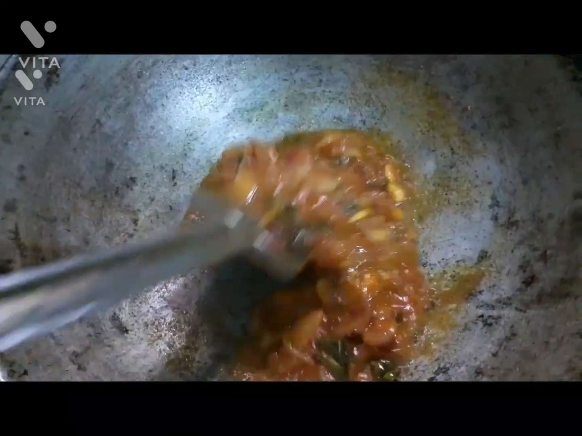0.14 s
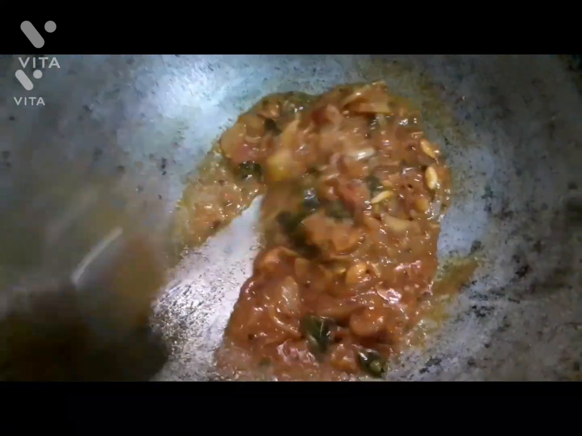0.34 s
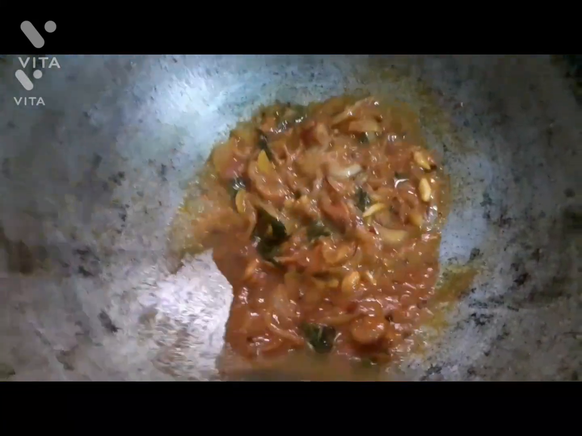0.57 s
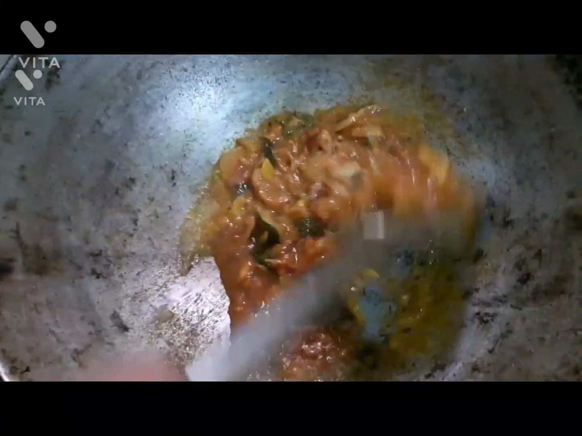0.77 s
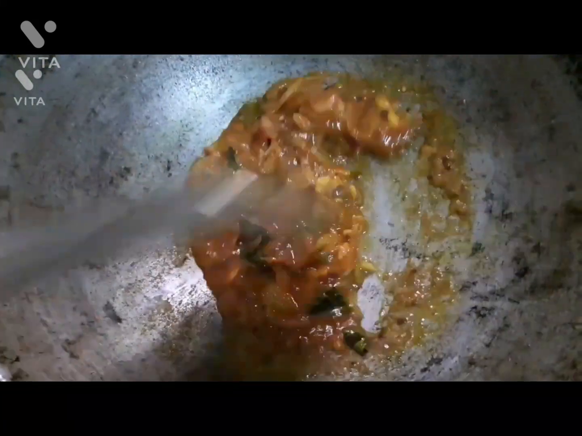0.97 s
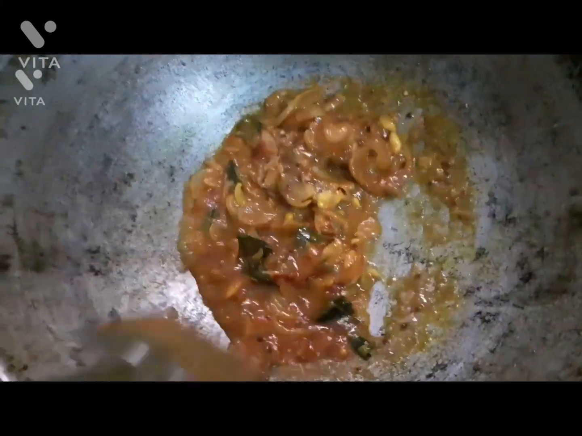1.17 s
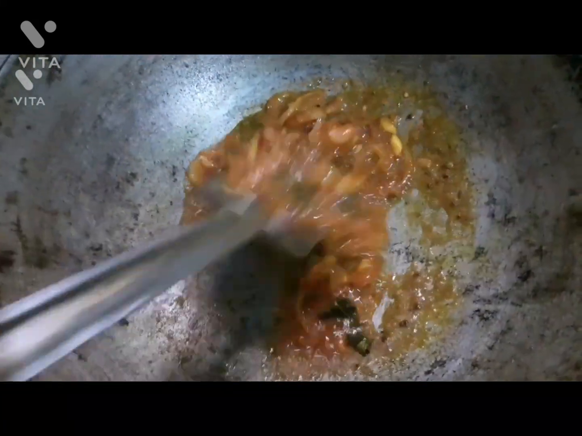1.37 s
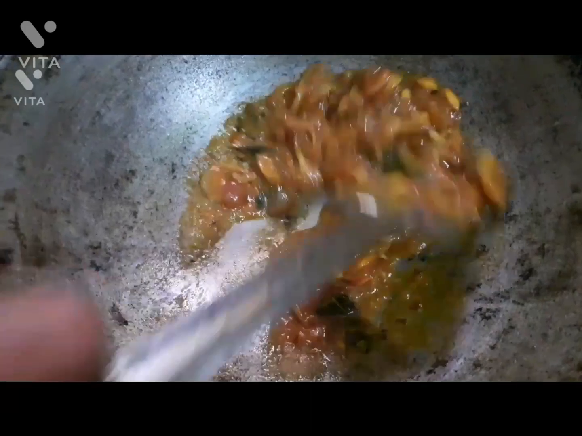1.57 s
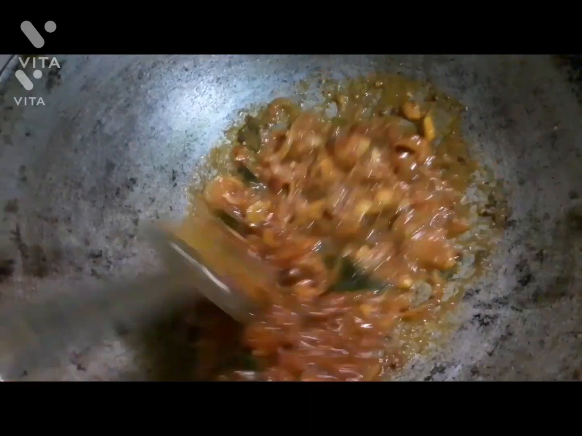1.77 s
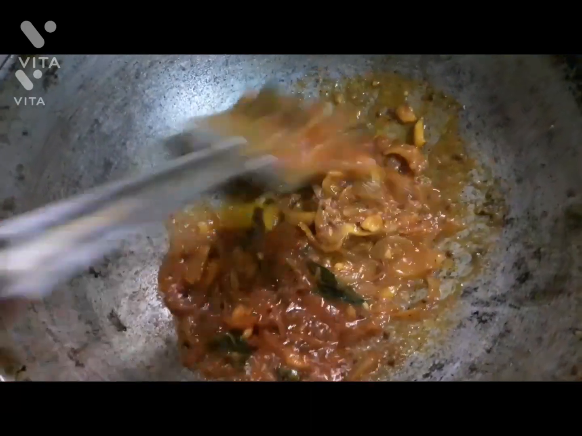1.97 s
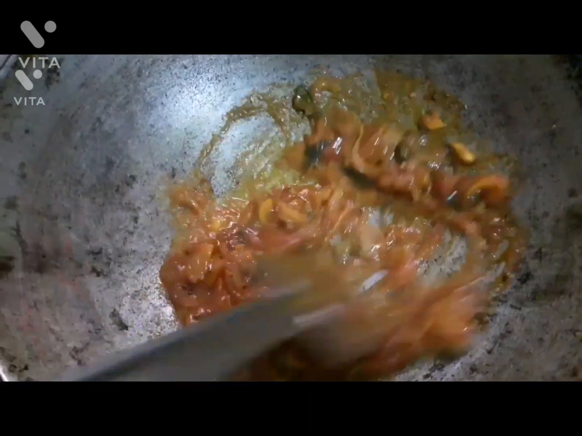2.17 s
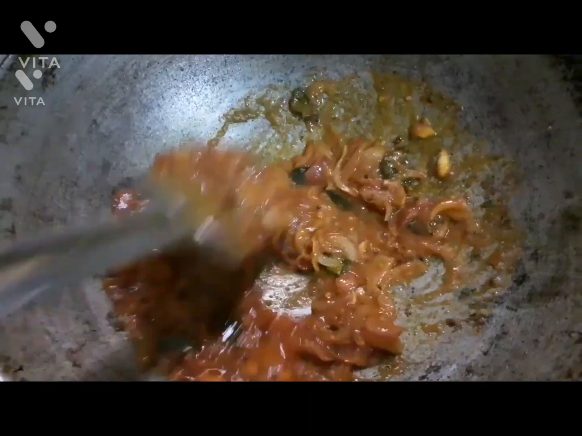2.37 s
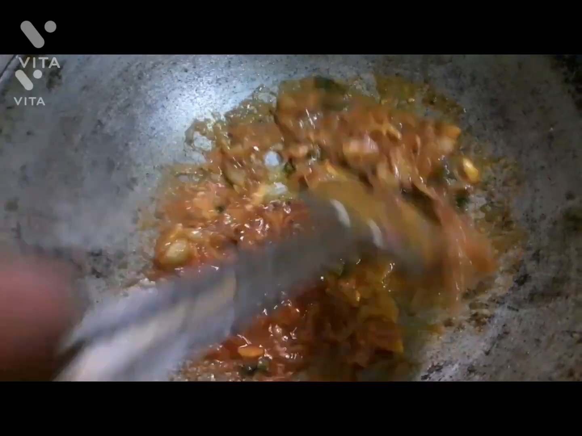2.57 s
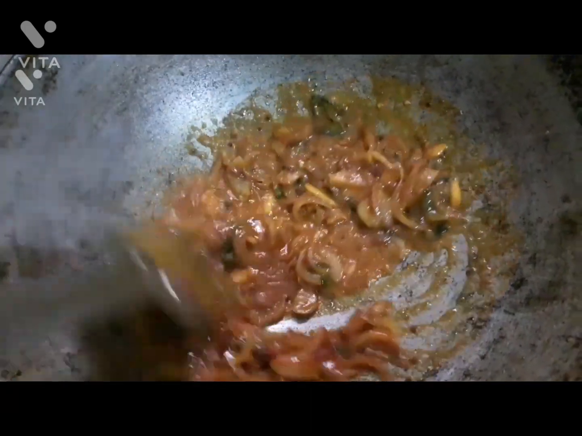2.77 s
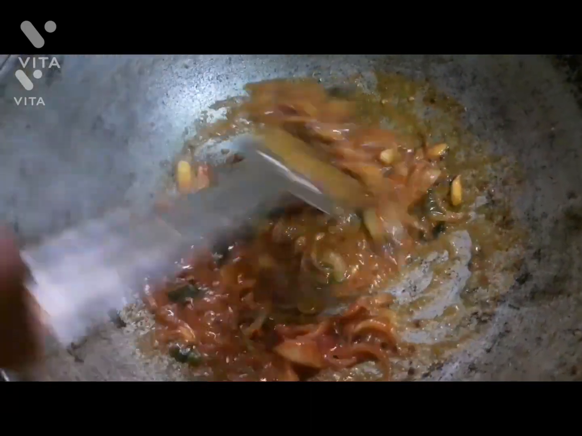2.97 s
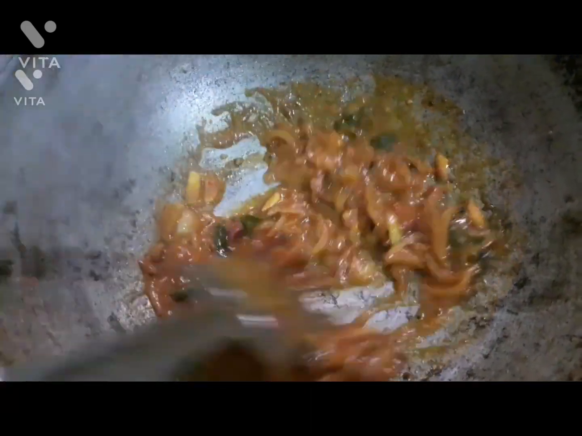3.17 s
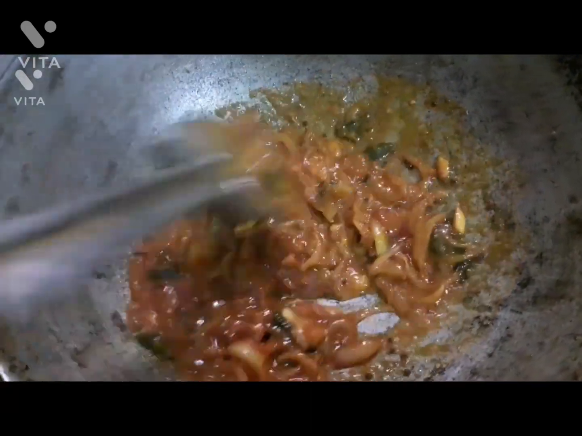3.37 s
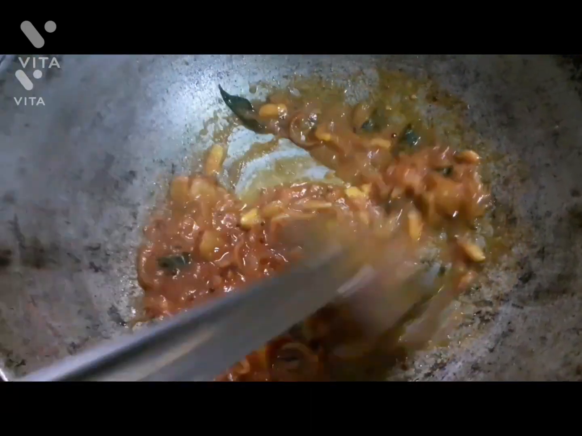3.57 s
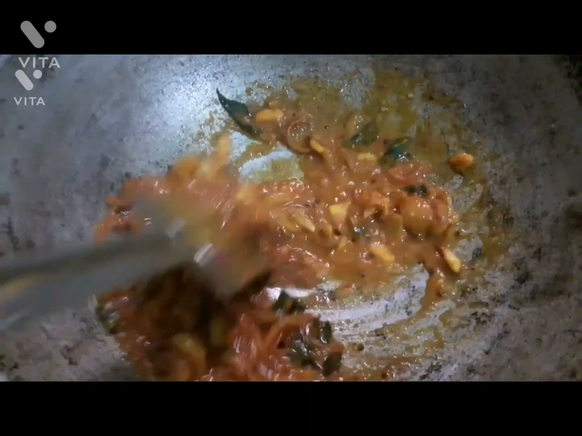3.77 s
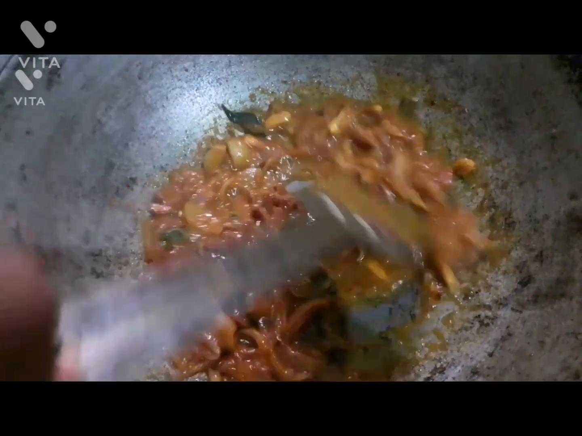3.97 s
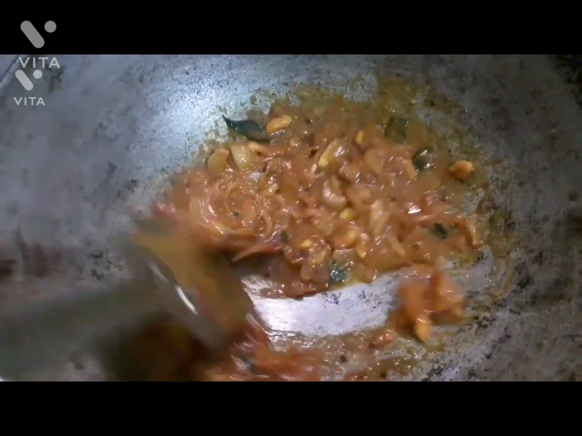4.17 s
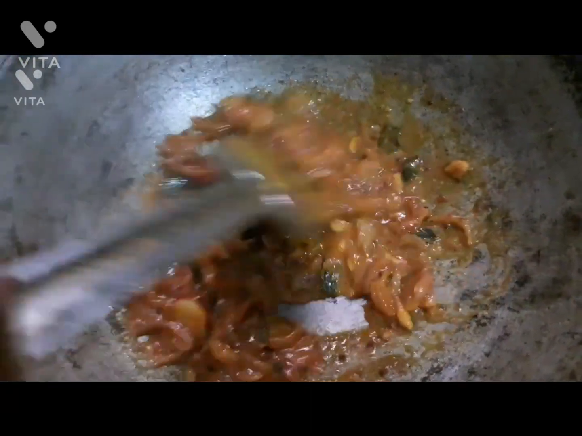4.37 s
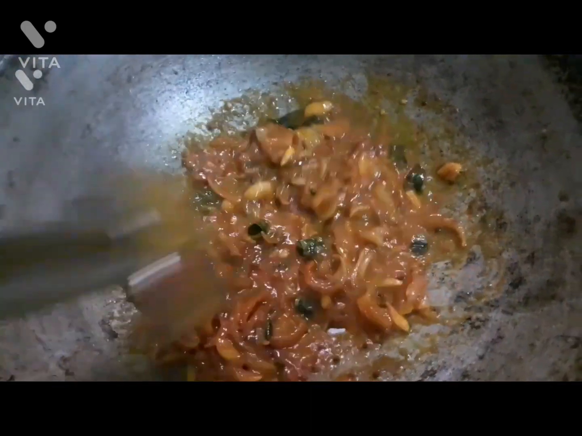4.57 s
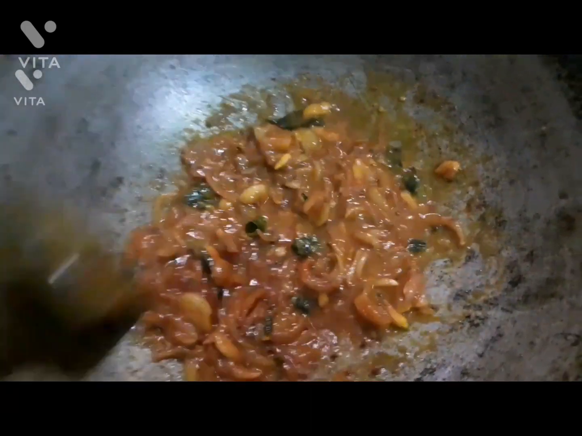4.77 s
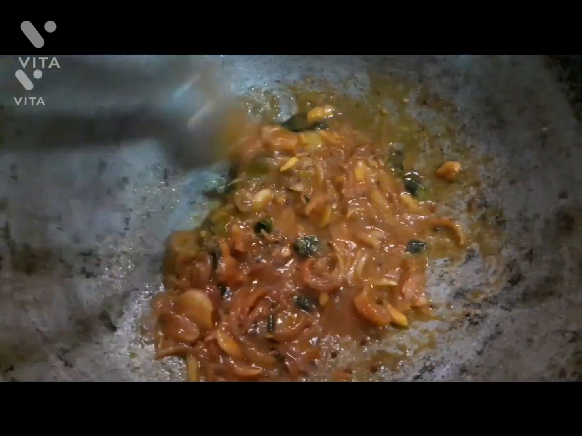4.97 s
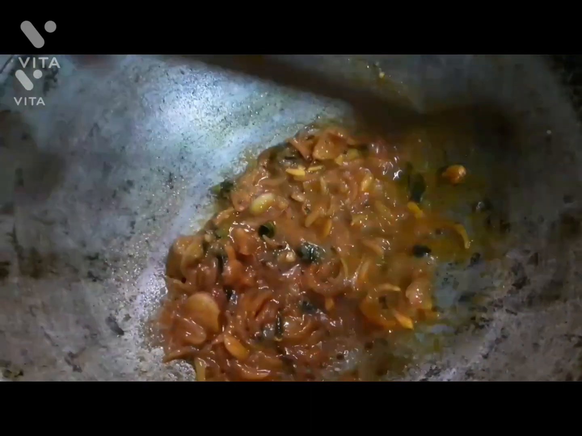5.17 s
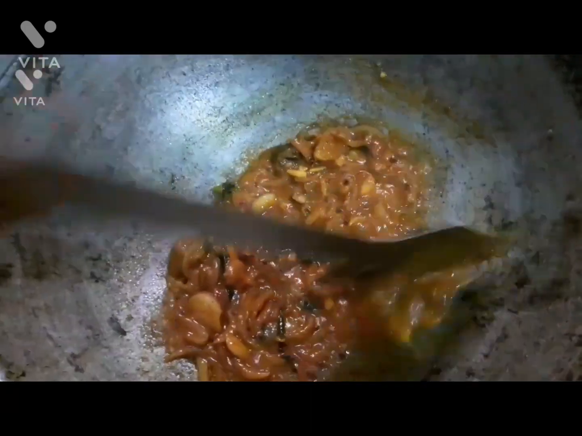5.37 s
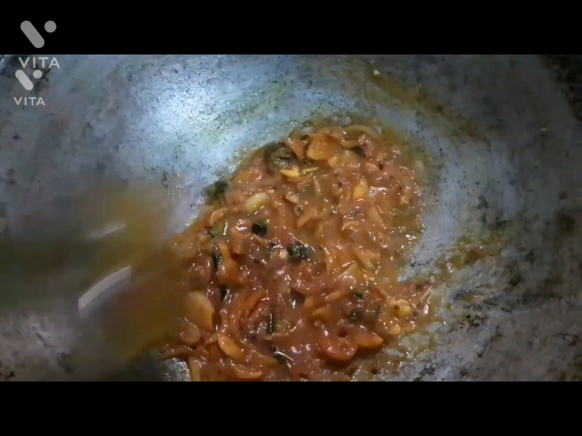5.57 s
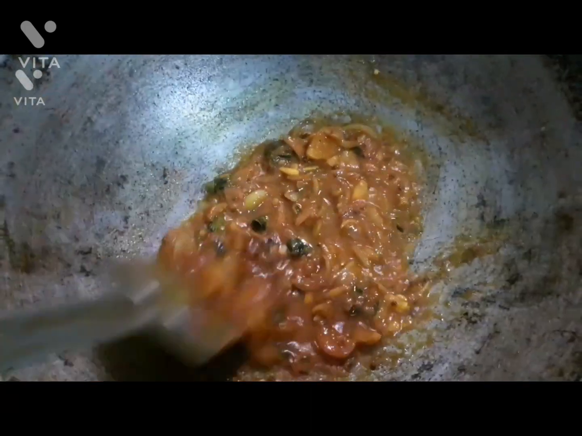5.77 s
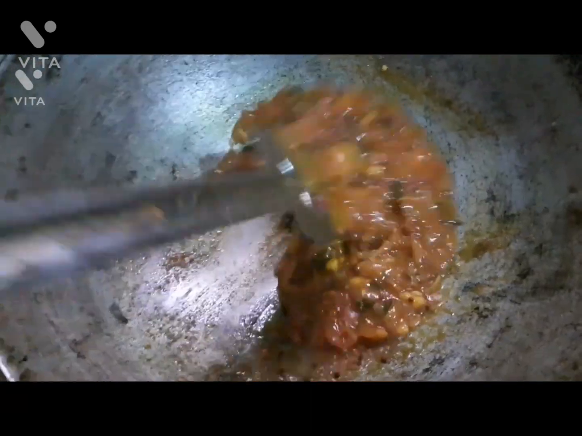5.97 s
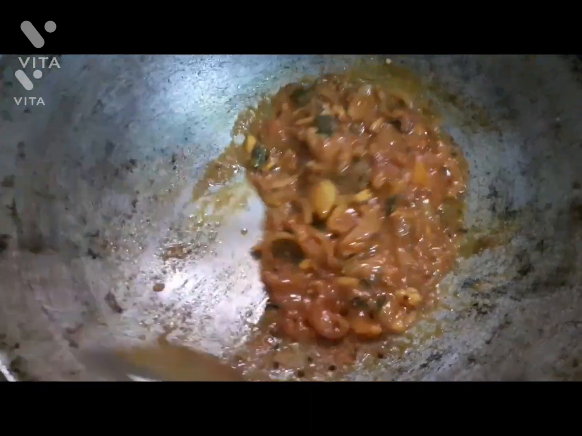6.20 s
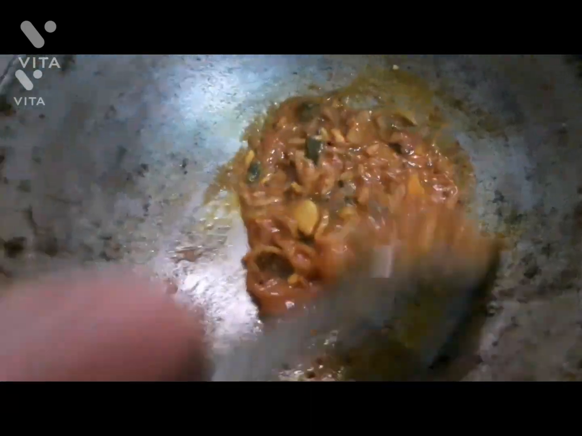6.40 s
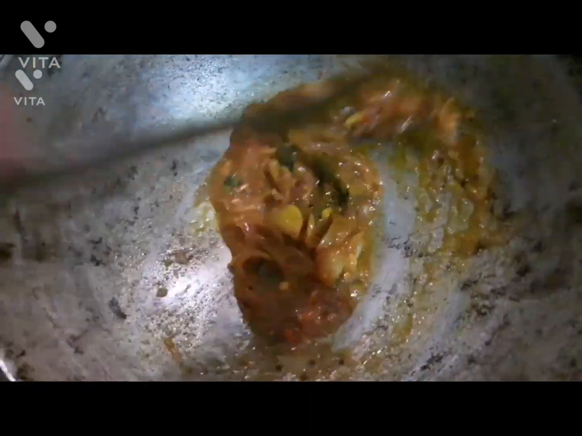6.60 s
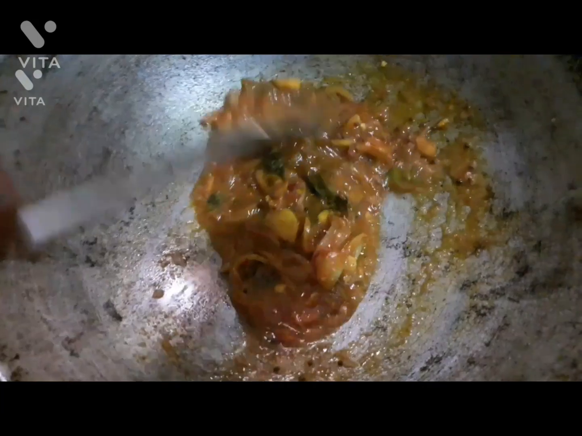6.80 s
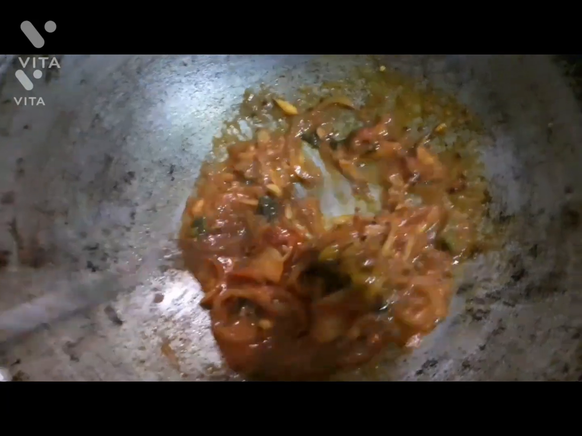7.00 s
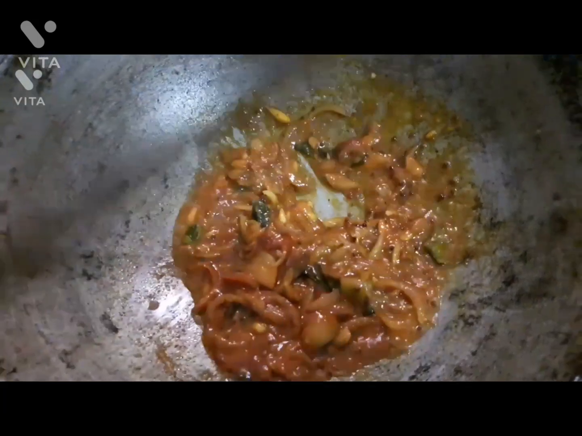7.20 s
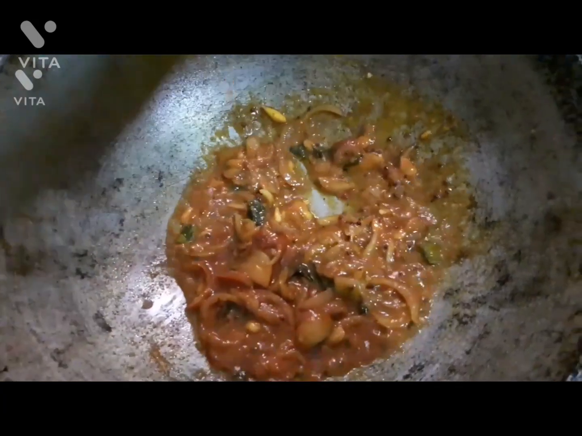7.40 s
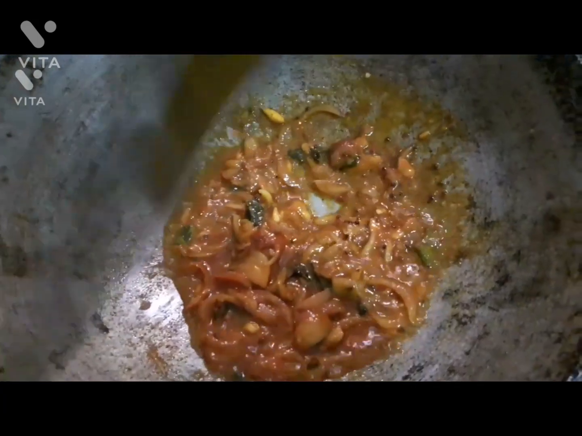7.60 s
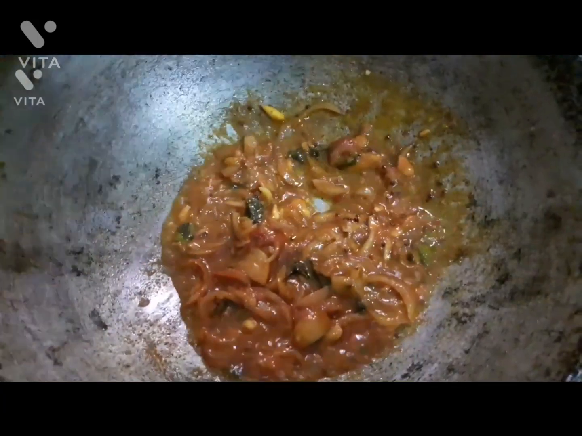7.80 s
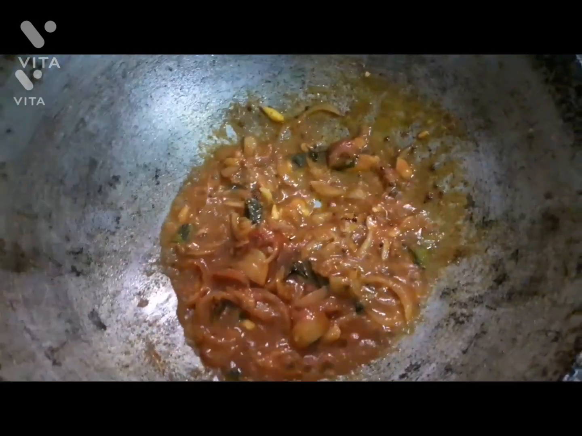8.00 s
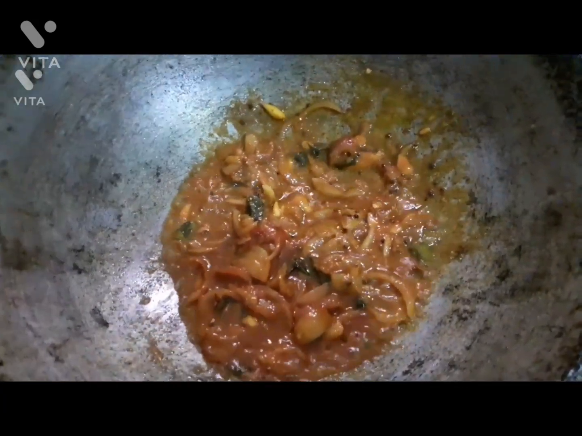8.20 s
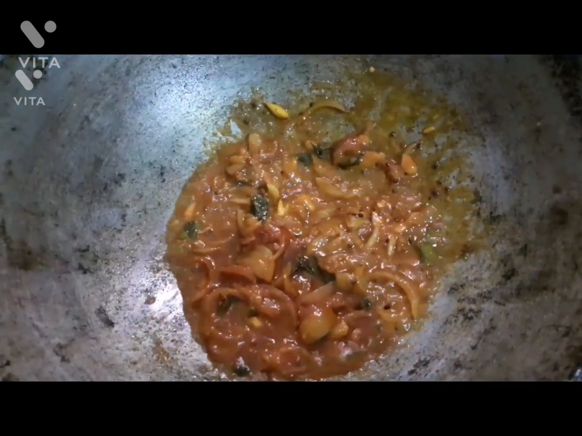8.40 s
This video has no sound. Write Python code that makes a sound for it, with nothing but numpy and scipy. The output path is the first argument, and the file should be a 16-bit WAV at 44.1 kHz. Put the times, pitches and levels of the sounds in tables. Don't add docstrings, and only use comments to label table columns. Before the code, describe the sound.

Close to a steel wok, thick spice paste fries with a steady bubbling simmer and fine hiss. A steel spatula stirs rhythmically, giving sloppy pushes, dull damped knocks and gritty scrapes, with a few bright clinks. Big bubbles crack loudly around two seconds. Near five seconds the blade squeaks and stutters on the rim, then come several louder clinks before stirring ends and only simmering remains. Small home kitchen, phone microphone very close, bright stereo.

```python
import sys
import numpy as np
from scipy import signal
from scipy.fft import rfft, irfft, next_fast_len
from scipy.io import wavfile
from scipy.ndimage import uniform_filter1d

SR = 44100
rng = np.random.default_rng(int(sys.argv[2]) if len(sys.argv) > 2 else 0)


def store_pcm(level_fs):
    pcm = np.round(np.clip(level_fs, -1, 1) * 32767).astype(np.int16)
    wavfile.write(sys.argv[1], SR, np.atleast_2d(pcm).T)


def level_to_linear(level):
    exponent = np.asarray(level, float) / 20
    return 10 ** exponent


N = 372644

# time in seconds, level in dB.
BOIL = [(0.0, -29.5), (0.21, -32.5), (0.42, -34.5), (0.56, -31), (0.9, -35), (1.74, -29), (1.79, -25.5),
        (2.42, -25), (3.22, -27.5), (4.19, -28), (5.06, -31.5), (5.36, -34), (5.77, -33.5), (6.0, -36.5),
        (6.26, -32.5), (6.63, -36), (7.01, -32.5), (8.45, -32)]
HISS_FOLLOWS, HISS_DB = 0.97, -7
# time in seconds, extra hiss in dB.
THIN_FILM = [
    (1.2, 2),
    (1.8, 0),
    (2.45, 3.5),
    (5.1, 5),
    (5.4, 2.5),
    (6.6, 4),
    (7.0, 0),
]
# time, rise and fall in seconds, coarse and fine lift in dB.
SURGES = [(.39, .005, 0.077, 2, 4.5), (.62, 0.025, 0.035, 1.5, -2), (1.26, 0.014, 0.081, 2.5, -0.5),
          (1.79, 0.0084, 0.071, 3.5, 0.5), (2.272, 0.005, 0.12, 5, 5), (2.57, 0.0094, 0.016, 2.5, -1),
          (2.81, 0.05, 0.034, 4.5, 1), (3.25, 0.032, 0.057, 3, 0.5), (3.75, 0.042, 0.06, 4, 4.5),
          (4.23, 0.053, 0.06, 4, 3.5), (4.66, 0.0043, 0.17, 1.5, 2), (5.79, 0.042, 0.037, 3.5, 5.5),
          (5.88, 0.034, 0.0305, 5.5, 1.5), (6.74, 0.0053, 0.053, 4.5, 5.5), (6.82, 0.017, 0.03, 2.5, 0)]
# frequency in Hz, level in dB.
SIMMER = [(220, -23.5), (330, -13.5), (520, -2.5), (690, 0), (830, -3.5), (1050, -1.5), (1350, 5.5),
          (1650, -7.5), (2100, -10.5), (3000, -23)]
# frequency in Hz, level in dB.
BUBBLING = [(1200, -36), (1700, -8), (2200, -3), (2600, -2.5), (3150, -2.5), (3750, 1), (3950, -1.5),
            (4600, 0.5), (5400, -0.5), (6300, -9), (7500, -14.5)]
# frequency in Hz, level in dB.
HISS = [(5000, -40), (6300, -4.5), (7300, 1), (8500, -6), (9200, 1), (12000, -0.5), (15500, -1)]
# time and fade in seconds, paste slop in dB, blade pressure on the bowl in dB.
STROKES = [(0.11, 0.04, -55, -37), (0.3, .04, -59, -53), (0.38, 0.046, -50, -46), (0.62, 0.17, -57, -46),
           (1.06, 0.069, -57, -43), (1.41, 0.077, -55, -42), (1.75, 0.12, -56, -44),
           (2.22, 0.058, -59, -44), (2.49, 0.1, -63.5, -46), (2.73, 0.023, -61, -46),
           (2.94, 0.099, -58, -49), (3.2, 0.059, -58, -55.5), (3.41, 0.071, -65, -41.5),
           (3.65, .05, -57, -43.5), (3.88, 0.11, -58, -41.5), (4.29, 0.12, -61, -45),
           (4.4, 0.063, -64, -45), (4.66, 0.05, -54, -39), (4.97, 0.15, -56, -39.5),
           (5.13, 0.061, -55, -33.5), (5.39, .05, -64, -63), (5.55, 0.091, -48, -46),
           (5.66, 0.036, -63.5, -43), (5.88, 0.076, -54, -36.5), (6.12, 0.076, -51.5, -54),
           (6.28, 0.17, -61, -41.5), (6.74, 0.13, -65.5, -39), (7.34, 0.051, -68, -58.5),
           (7.81, 0.062, -75, -65), (8.07, 0.032, -67, -66.5)]
STROKE_RISE_S, DRAG = 0.031, 1.52
REST_SLOP_DB, REST_PRESSURE_DB = -87, -56.5
# frequency in Hz, level in dB.
SLOP = [(25, -27), (50, -4), (80, 6), (125, 1.5), (170, 3), (260, 6), (400, -32)]
# frequency in Hz, level in dB, T60 in seconds.
BOWL = [(215.3, -3, 0.68), (259.2, 4, 0.63), (363, 3, 0.22), (387.3, 1, 0.65), (412.3, 2, 0.91),
        (458.4, 3, 0.17), (515, -0.5, 0.37), (602, 3.5, 0.23), (672.4, 4, 0.45), (700, -15, 0.52),
        (925, 9.5, 0.057)]
# frequency in Hz, width in Hz, level in dB.
FLAME = [(120, 11, -73), (274, 11, -72)]
# time in seconds, blow in dB, pitch of the loudest ring in Hz,
# push in dB, freedom to ring from 0 to 1.
KNOCKS = [(0.119, -34, 493, -60, 0.5), (0.375, -33, 380, -58, 0.3), (0.612, -30.5, 614, -55, 0.16),
          (1.047, -36.5, 369, -60.5, 0.56), (1.366, -31.5, 256, -67, 0.27), (1.792, -32.5, 415, -64, 0.8),
          (2.209, -34, 643, -47, 0.3), (2.436, -50, 393, -63, 0.35), (2.616, -40, 670, -78, 0.6),
          (2.951, -38, 517, -59, 0.46), (3.199, -56.5, 694, -60, 0.16), (3.634, -36, 378, -45, 0.2),
          (4.149, -39, 260, -62, 0.7), (4.29, -38, 727, -51, 0.3), (4.646, -38, 368, -64, 1),
          (4.753, -36, 519, -70, 0.52), (5.38, -39, 401, -58, 0.16), (5.516, -33.5, 406, -64, 0.9),
          (5.887, -27.5, 377, -60, 0.33), (6.114, -36, 280, -65, 0.6), (6.727, -31, 422, -64, 0.23),
          (7.107, -42, 587, -67.5, 0.5)]
# time in seconds, bright ring in dB, pitch of the loudest ring in Hz,
# middle ring in dB, presence ring in dB.
CLINKS = [
    (0.378, -22.5, 6700, -36, -25),
    (0.614, -31, 6500, -39, -31),
    (1.2338, -30, 6800, -28, -36),
    (4.649, -26, 6300, -39.5, -27),
    (4.68, -29, 5700, -46, -26),
    (4.7266, -31, 4860, -46, -32),
    (4.999, -27.5, 4900, -40, -42),
    (5.5158, -20, 6350, -29, -22),
    (6.1195, -21, 6040, -27.5, -23),
    (6.7303, -23, 7510, -27, -25.5),
]
TICK = 9.5
FLAT_DULLS = 0.7
TOP_RING_DB = -17
# frequency in Hz, level in dB, T60 in seconds.
STEEL = [(1050, 4, 0.22), (1220, -14, 0.16), (1370, 5, 0.063), (1575, -4, 0.095), (1640, 8, 0.071),
         (2690, -14.5, .1), (2810, 2.5, 0.099), (3200, -19, 0.09), (3700, 13, 0.098), (4100, 20.5, 0.049),
         (4690, 8, 0.061)]
# frequency in Hz, level in dB, T60 in seconds.
BLADE = [(5180, -3, 0.066), (5860, 3, 0.17), (6180, -1, 0.18), (7360, -18, 0.11), (9540, 8, 0.15),
         (12300, 14, 0.1), (14130, 5, .05)]
# time in seconds, frequency in Hz,
# level in dB, T60 in seconds.
ACCENTS = [(0.378, 3661, -32, .03), (0.378, 12440, -24, .075), (4.6485, 3900, -23, .03),
           (4.6485, 6340, -17.5, .07), (4.655, 2900, -35, .1), (4.68, 3710, -33, .09),
           (4.7266, 4860, -27, .08), (5.516, 3500, -27, 0.043), (5.5162, 6030, -16.5, 0.074),
           (5.5162, 6650, -20, .05), (5.5158, 12800, -17, .035), (5.5158, 13800, -18, .02),
           (6.122, 3000, -38, 0.12), (6.1197, 5430, -23.5, .1), (6.1197, 12340, -23, .056),
           (6.1195, 13300, -11, .008), (6.1195, 15600, -22, .012), (6.7303, 900, -7.5, 0.005),
           (6.7303, 430, -24, .009), (6.75, 690, -35, .12), (6.782, 350, -30, .07),
           (6.73, 1292, -27, 0.066), (6.73, 1580, -27, 0.05), (6.7302, 4700, -19, .025),
           (6.73, 684, -28, 0.046), (6.7301, 2300, -22, .006), (6.1197, 5930, -27, 0.14),
           (6.121, 9540, -26, .13), (5.516, 9523, -26, .2), (0.613, 1250, -24, .006), (1.79, 600, -29, .03),
           (5.1, 385, -39, .5), (5.155, 370, -35, .12), (5.25, 400, -35, .1), (5.516, 5500, -30, .12),
           (0.45, 700, -33, .03)]
# time and length in seconds, pitch and width in Hz, level in dB.
SCRAPES = [(.46, .1, 5340, 400, -40), (0.598, 0.11, 5250, 400, -42), (1.232, 0.064, 4800, 700, -36),
           (1.777, 0.12, 2230, 500, -35), (4.648, .07, 5600, 900, -41), (5.773, 0.072, 4930, 900, -37),
           (5.52, 0.03, 1520, 600, -43), (6.735, .065, 650, 700, -40), (5.517, .04, 7000, 6000, -34),
           (6.121, .04, 7000, 6000, -35), (4.86, .14, 1500, 500, -44)]
# time in seconds, peak in dB, pitch in Hz.
CRACKS = [(1.0281, -21.5, 3120), (1.0515, -19, 3070), (1.269, -22, 3080), (1.3234, -20, 3560),
          (1.7834, -8, 3200), (1.7924, -13, 2130), (1.8108, -6, 3560), (1.8274, -8, 3540),
          (2.0512, -12, 3150), (2.2657, -7, 3470), (2.3511, -7, 3660), (4.554, -18, 3200),
          (4.9367, -22, 3610), (5.1507, -19, 2650), (5.1901, -21, 2670), (5.2026, -23, 2870),
          (5.2124, -16, 2780), (5.6228, -19, 3190), (5.7813, -19, 3800), (6.5231, -23, 2630),
          (6.573, -20, 3080), (6.8194, -15, 3300), (6.9097, -23, 3600), (8.1457, -18, 3100)]
CRACK_T60_S, CRACK_DB = 0.022, -14
# time in seconds, pitch in Hz, level in dB, length in seconds.
DRIP = [
    (3.375, 862, -31, 0.0194),
]
# time in seconds, first and last pitch in Hz, level in dB, width in Hz.
SQUEAKS = [
    (4.89, 1175, 1220, -31.5, 148),
    (4.965, 1080, 700, -34, 200),
    (4.93, 900, 860, -39, 120),
    (5.115, 2640, 2760, -37, 90),
    (5.175, 2810, 2800, -32.5, 100),
    (5.105, 1150, 1300, -33, 120),
    (5.165, 1230, 1080, -33.5, 100),
    (5.754, 3940, 4100, -31.5, 200),
    (5.845, 3620, 3700, -40, 200),
]
SQUEAK_S = 0.083
# time in seconds, slips per second, level in dB.
CHATTER = [
    (4.999, 200, -41),
    (5.029, 230, -34),
    (5.037, 320, -18.5),
    (5.05, 212, -19),
    (5.065, 240, -18.5),
    (5.079, 230, -23),
    (5.102, 230, -27),
]
# frequency in Hz, width in Hz, level in dB.
RIM = [(252, 62, -34), (352, 22, -7), (493, 150, -0.5), (637, 43, 2), (896, 36, 1), (1100, 43.4, 1.5),
       (1220, 69, 6), (1350, 70, -2), (1600, 63, 5), (800, 1400, -23)]
# time, rise and fall in seconds, level in dB.
SPIT = [
    (6.356, 0.0058, 0.0135, -16.5),
]
# frequency in Hz, level in dB.
SPIT_TONE = [(100, -50), (300, -23), (700, -10), (1400, -0.5), (2000, -7.5), (2800, -10.5), (3800, -14),
             (5500, -13), (8000, -25)]
# frequency in Hz, share from 0 to 1.
SAME = [(50, 0.25), (250, 0.84), (650, 0.74), (1300, 0.35), (1800, 0.21), (6200, 0.034), (7100, 0.91),
        (8000, 0.13), (9200, 1), (12500, 0.81), (13100, 0.49), (14500, 0.65), (16000, 0.64)]
LAG_S, LAG_ENDS_HZ = 0.00013, 6050
ECHO_DB, ECHO_T60_S = -10, 0.035
RIM_LAG_S = -0.00026
# frequency in Hz, level in dB.
LEFT_PORT = [(60, 6), (250, 3), (600, 4), (1200, 4.5), (2000, 10), (3200, 16.5), (4500, 7.5), (6000, 2.5),
             (7400, -9), (7900, -32), (8500, -3), (9000, -14), (12000, -3.5), (15500, -3)]
# centre and width in Hz, share of time lost left and right.
STARVED = [(6550, 500, .12, .12), (8200, 650, .7, .03), (8500, 350, .75, .3), (9500, 500, .03, .02),
           (11000, 600, .03, .03), (13100, 700, .14, .14), (13900, 600, .08, .08), (14600, 700, .09, .09)]
EDGE_HZ = 15730


def evened(x):
    return x / np.sqrt(np.mean(x ** 2) + 1e-20)


def read(points, hz):
    f, value = np.transpose(points)
    return np.interp(np.log(hz + 1), np.log(f + 1), value)


def curve(rows):
    return np.interp(np.arange(N) / SR, *np.transpose(rows))


def add(mix, s, sound):
    part = mix[round(s * SR):][:len(sound)]
    part += sound[:len(part)]


def seconds(length):
    return np.arange(round(length * SR)) / SR


def smooth_noise(count, samples):
    return evened(uniform_filter1d(rng.standard_normal(count), samples))


def swell(s, rise, fall):
    t = np.arange(N) / SR - s
    return np.exp(-0.5 * np.minimum((t / np.where(t < 0, rise, fall)) ** 2, 60))


def colour(x, gain):
    size = next_fast_len(len(x) + 4096)
    return irfft(rfft(x, size) * gain(np.fft.rfftfreq(size, 1 / SR)), size)[:len(x)]


def shaped(x, points):
    return evened(colour(x, lambda hz: level_to_linear(read(points, hz))))


def bandpass(x, order, low_hz, high_hz):
    sos = signal.butter(order, [low_hz / SR * 2, high_hz / SR * 2], "band", output="sos")
    return signal.sosfilt(sos, x)


def resonate(x, hz, width):
    turn = np.exp(2j * np.pi * np.cumsum(hz * np.ones(len(x))) / SR)
    r = np.exp(-np.pi * width / SR)
    return 2 * (turn * signal.lfilter([1 - r], [1, -r], x / turn)).real


def sustained(x, hz, width):
    return evened(signal.lfilter(*signal.iirpeak(hz, hz / width, SR), x))


def ring(modes, extra_db, damping):
    t = seconds(0.4)
    hz, db, t60 = np.transpose(modes)[:, :, None]
    luck = rng.standard_normal((len(modes), 2, 1))
    level_db = db + np.reshape(extra_db, (-1, 1)) + 3 * luck[:, 0] - 60 * t / (t60 * damping)
    detuned_hz = hz * (1 + 0.003 * luck[:, 1])
    return (level_to_linear(level_db) * np.sin(2 * np.pi * detuned_hz * t)).sum(0)


def twice(x):
    return np.array([x, np.roll(x, N // 2)])


def steam(patchy_db, flicker_db):
    frames = N // 64 + 5
    a, b, patches = rng.standard_normal((frames, 129, 3)).T
    patches = evened(uniform_filter1d(uniform_filter1d(patches, 5, 0), 30, 1))
    flicker = smooth_noise(frames, 12)
    z = (a + 1j * b) * level_to_linear(patchy_db * patches + flicker_db * flicker)
    return evened(signal.istft(z, nperseg=256, noverlap=192)[1][:N])


def pops(per_s, spread_db, life_s):
    when, size, kind = rng.random((N, 3)).T
    size = level_to_linear(spread_db * np.minimum(-np.log(size + 1e-9), 5)) * (when < per_s / SR)
    t, out = np.arange(200) / SR, np.zeros(N)
    pitches = np.linspace(600, 15600, num=18)
    kind = (kind * len(pitches)).astype(int)
    for k, hz in enumerate(pitches):
        rising = np.sin(2 * np.pi * hz * t * (1 + 30 * t))
        blip = t / life_s * np.exp(-t / life_s) * rising
        out += signal.oaconvolve(size * (kind == k), blip)[:N]
    return evened(out)


def frying():
    coarse_lift_db, fine_lift_db = np.zeros((2, N))
    for s, rise, fall, coarse_lift, fine_lift in SURGES:
        surge = swell(s, rise, fall)
        coarse_lift_db += coarse_lift * surge
        fine_lift_db += fine_lift * surge
    crackle = 0.31 * level_to_linear(0.21 * coarse_lift_db)
    boil = steam(patchy_db=1.5, flicker_db=0.61) + crackle * pops(per_s=2500, spread_db=3.0, life_s=0.00031)
    coarse_db = curve(BOIL) + coarse_lift_db
    fine_db = HISS_FOLLOWS * curve(BOIL) + HISS_DB + curve(THIN_FILM) + fine_lift_db
    simmer = level_to_linear(0.59 * coarse_db - 27.5) * twice(shaped(boil, SIMMER))
    coarse = level_to_linear(coarse_db - 6.5) * twice(shaped(boil, BUBBLING))
    return simmer + coarse + level_to_linear(fine_db) * twice(shaped(boil, HISS))


def strokes(db, rest_db, drag):
    power = level_to_linear(2 * rest_db) * np.ones(N)
    for (s, fade, *_), level_db in zip(STROKES, db):
        power += level_to_linear(2 * level_db) * swell(s, STROKE_RISE_S, drag * fade) ** 2
    return np.sqrt(power)


def stirring():
    grit, wet = rng.standard_normal((N, 2)).T
    drift = uniform_filter1d(uniform_filter1d(rng.standard_normal(N), 500), 500)
    lumps = level_to_linear(3.4 * evened(drift))
    hum = sum(level_to_linear(db) * sustained(grit * lumps, hz, 2.75 / t60 * 3) for hz, db, t60 in BOWL)
    hum = signal.sosfilt(signal.butter(4, 215 / SR * 2, "high", output="sos"), hum)
    _, _, slop_db, pressure_db = np.transpose(STROKES)
    slop = strokes(slop_db - 2.0, REST_SLOP_DB, 1.0) * twice(shaped(wet * lumps, SLOP))
    return slop + strokes(pressure_db - 5.0, REST_PRESSURE_DB, DRAG) * twice(evened(hum))


def burner():
    return twice(sum(level_to_linear(db) * sustained(rng.standard_normal(N), hz, width) for hz, width, db in FLAME))


def knock(db, hz, push_db, free):
    t = seconds(0.4)
    near_db = -7 * abs(np.log2(np.array(BOWL)[:, 0] / hz))
    rings = ring(BOWL, db - 14.5 + near_db, damping=max(free, 0.05))
    push = level_to_linear(push_db - 60 * t / 0.088) * np.sin(2 * np.pi * 95 * t * np.exp(-8 * t))
    thud = evened(bandpass(rng.standard_normal(len(t)), 2, 160, 1100))
    thud = thud * level_to_linear(db - 3.5 - 60 * t / 0.083)
    return (rings + thud + push) * np.minimum(t / 0.002, 1)


def clink(db, hz, middle_db, presence_db):
    t = seconds(0.4)
    modes = np.array([*STEEL, *BLADE, (hz, 9.5, 0.1)])
    mode_hz = modes[:, 0]
    top_db = presence_db + TOP_RING_DB - FLAT_DULLS * max(middle_db + 21.0, 0)
    group_db = np.select([mode_hz < 2000, mode_hz < 4400, mode_hz < 8500],
                         [middle_db - 14.5, presence_db - 19.5, db - 11.5], top_db)
    decay = 1.3 * level_to_linear(-60 * t / 0.0067) + 0.5 * level_to_linear(-60 * t / 0.035) + 0.38 * level_to_linear(-60 * t / 1.24)
    crack = rng.standard_normal(len(t)) * decay
    crack[round(0.0008 * SR)] += TICK

    def crack_gain(f):
        bass_cut = f ** 2 / (f ** 2 + 500 ** 2)
        return level_to_linear(np.interp(f, mode_hz[:-1], group_db[:-1]) + 13.5) * bass_cut

    rings = ring(modes, group_db - 4.0, damping=0.85) * np.minimum(t / 0.00087, 1)
    blow = rings + colour(crack, crack_gain)
    bounce = round(0.0052 * SR)
    return blow + 0.085 * np.roll(blow, bounce) * (np.arange(len(t)) >= bounce)


def ping(hz, db, t60):
    t = seconds(0.25)
    beat = 1 + 0.4 * np.cos(2 * np.pi * (rng.uniform(56, 220) * t + rng.random()))
    envelope = level_to_linear(db - 60 * t / t60) * beat * np.minimum(t / 0.0002, 1)
    return -envelope * np.sin(2 * np.pi * hz * t)


def scrape(length, hz, width, db):
    when, size = rng.random((round(length * SR), 2)).T
    grit = (when < 1500 / SR) * np.log(size + 1e-9) + 0.05 * (size - 0.5)
    rasp = resonate(resonate(grit, hz, width), hz, width)
    return level_to_linear(db) * evened(rasp) * np.sin(np.pi * np.linspace(0, 1, len(grit)) ** 0.65)


def snap(db, hz):
    return ping(hz, db + CRACK_DB, CRACK_T60_S)


def drip(hz, db, length):
    t = seconds(length)
    return level_to_linear(db - 4 * t / length) * signal.windows.tukey(len(t), 0.25) * np.sin(2 * np.pi * hz * t)


def squeak(first_hz, last_hz, db, width):
    count = round(SQUEAK_S * SR)
    hz = np.linspace(first_hz, last_hz, count)
    fuzz = resonate(resonate(rng.standard_normal(count), hz, width), hz, width)
    waver = 1 + 0.02 * smooth_noise(count, 300)
    grip = level_to_linear(1.5 * smooth_noise(count, 350))
    tone = np.sin(2 * np.pi * np.cumsum(hz * waver) / SR)
    body = evened(1.4 * evened(fuzz) + 1.0 * tone)
    return level_to_linear(db - 8) * body * grip * signal.windows.tukey(count, 0.6)


def chatter():
    s, per_s, db = np.transpose(CHATTER)
    t = np.arange(s[0], s[-1] + 0.51, 1 / SR)
    uneven = 1 + 0.066 * smooth_noise(len(t), 150)
    turns = np.floor(np.cumsum(np.interp(t, s, per_s) * uneven) / SR)
    slip_db = 1.8 * rng.standard_normal(len(t)) - 4.0 * (turns % 2)
    slips = np.diff(turns, prepend=0) * level_to_linear(slip_db)
    drive = evened(slips) + 0.4 * rng.standard_normal(len(t))
    drive = drive * level_to_linear(np.interp(t, s, db, right=-90))
    rings = sum(level_to_linear(mode_db) * resonate(drive, hz, width) for hz, width, mode_db in RIM)
    return s[0], bandpass(-2.2 * rings, 9, 190, 1720)


def spit():
    s, rise, fall, db = SPIT[0]
    when, size = rng.random((N, 2)).T
    droplets = evened((when < 1500 / SR) * np.log(size + 1e-9))
    burst = rng.standard_normal(N) + 0.8 * droplets
    return level_to_linear(db) * shaped(burst, SPIT_TONE) * swell(s, rise, fall)


def echoed(x):
    t = seconds(0.05)
    tail = rng.standard_normal((len(t), 2)).T * level_to_linear(-60 * t / ECHO_T60_S) * np.minimum(t / 0.0013, 1)
    tail = level_to_linear(ECHO_DB) * tail / np.linalg.norm(tail, axis=1, keepdims=True)
    return x + signal.oaconvolve(x[None], tail, axes=1)[:, :N]


def early(share):
    return lambda hz: share(hz) * np.exp(2j * np.pi * hz * LAG_S * (hz < LAG_ENDS_HZ))


def ports(spread, point, rim):
    def same(hz):
        return np.clip(read(SAME, hz), 0, 1)

    shared = colour(spread[0], early(same))
    own = colour(spread[1], lambda hz: np.sqrt(1 - same(hz) ** 2))
    near, far = echoed(point), echoed(rim)
    far_left = colour(far[0], lambda hz: np.exp(2j * np.pi * hz * RIM_LAG_S))
    left = shared + own + colour(near[0] + far_left, early(np.ones_like))
    right = spread[0] + near[1] + far[1]
    return np.array([left, right])


def scene():
    spread = frying() + stirring() + burner()
    steel, rim = np.zeros((2, N))
    for s, *row in ACCENTS:
        add(steel, s, ping(*row))
    steel = colour(steel, lambda hz: hz ** 4 / (hz ** 4 + 170 ** 4))
    for s, *row in KNOCKS:
        add(steel, s + 0.0025, knock(*row))
    for rows, sound in [(CLINKS, clink), (SCRAPES, scrape), (CRACKS, snap), (DRIP, drip),
                        (SQUEAKS, squeak)]:
        for s, *row in rows:
            add(steel, s, sound(*row))
    add(rim, *chatter())
    spit_gain = level_to_linear(np.array([[0], [-14]]))
    return ports(spread, steel, rim) + spit() * spit_gain


def starved(x):
    hz, t, z = signal.stft(x, SR, nperseg=1024)
    power = abs(z) ** 2
    usual = uniform_filter1d(power, size=12, axis=1)
    z = z * ((power > 0.45 * usual) | (hz < 5500)[:, None])
    for centre_hz, width, left, right in STARVED:
        chance = np.repeat(rng.random(len(t)), rng.integers(2, 5, len(t)))[:len(t)]
        dropped = chance < np.array([[left], [right]])
        band = abs(hz - centre_hz) < width / 2
        z = z * (1 - dropped[:, None] * band[:, None])
    rumble_cut = hz ** 2 / (hz ** 2 + 60 ** 2)
    passed = rumble_cut * (hz < EDGE_HZ)
    return signal.istft(z * passed[:, None], SR, nperseg=1024)[1][:, :N]


def roll_off(x):
    return signal.sosfilt(signal.butter(12, 16970, fs=SR, output="sos"), x)


def record(dry):
    left = colour(dry[0], lambda hz: level_to_linear(read(LEFT_PORT, hz)))
    overloaded = np.tanh(np.array([left, dry[1]]))
    return roll_off(starved(overloaded))


dry = scene()
out = record(dry)
store_pcm(out)
```